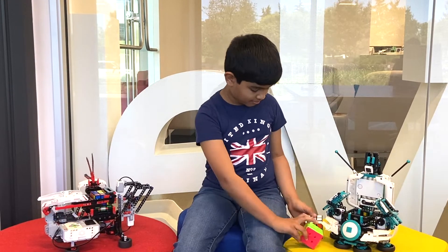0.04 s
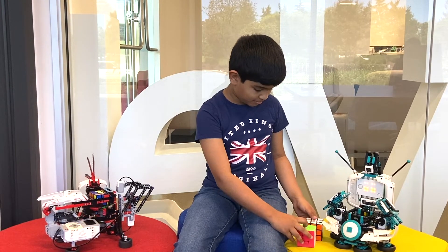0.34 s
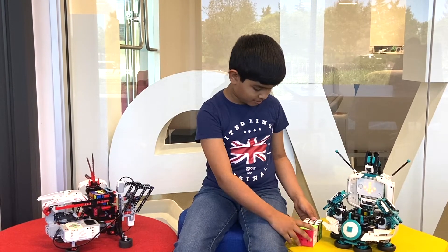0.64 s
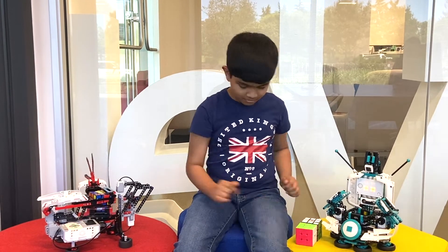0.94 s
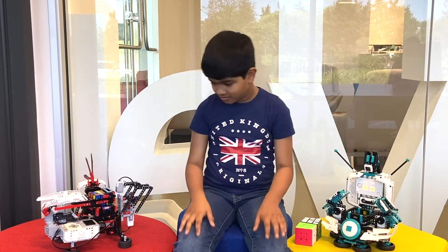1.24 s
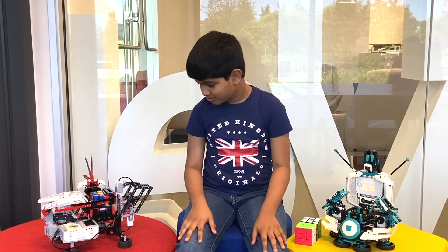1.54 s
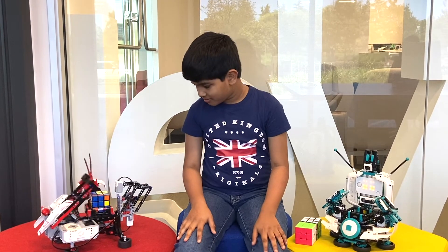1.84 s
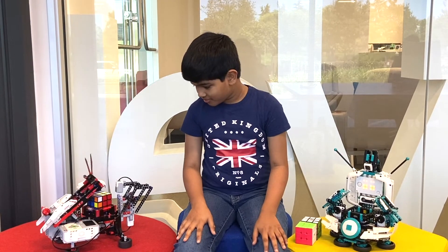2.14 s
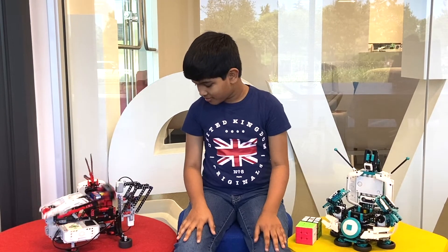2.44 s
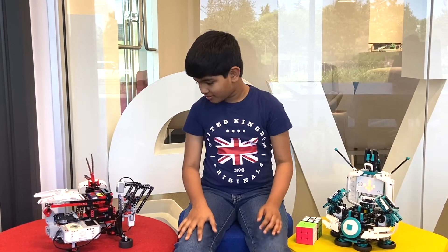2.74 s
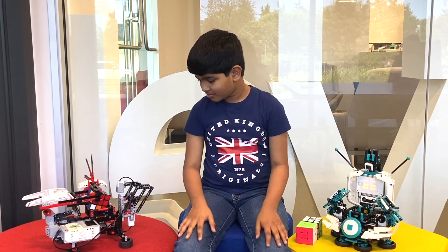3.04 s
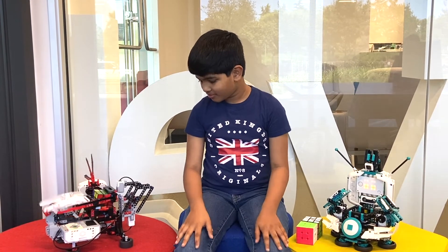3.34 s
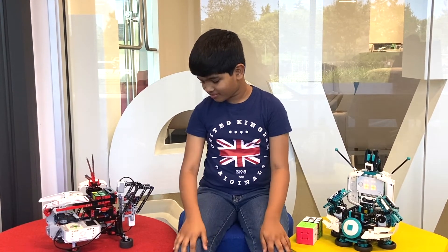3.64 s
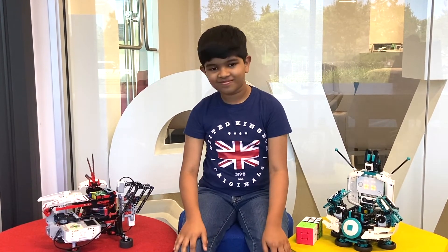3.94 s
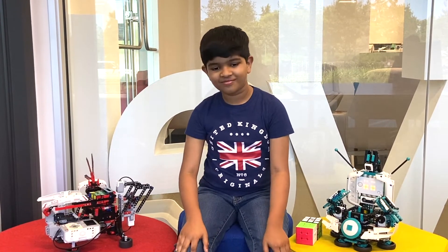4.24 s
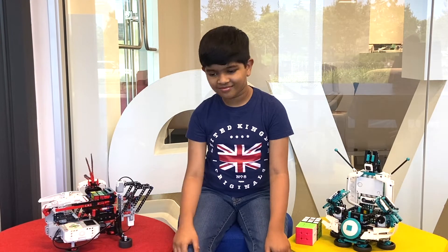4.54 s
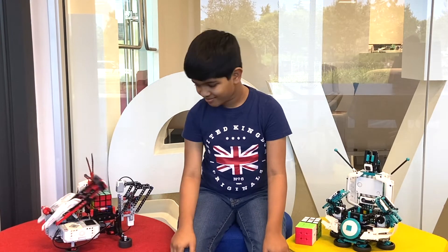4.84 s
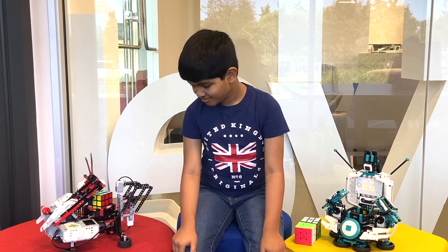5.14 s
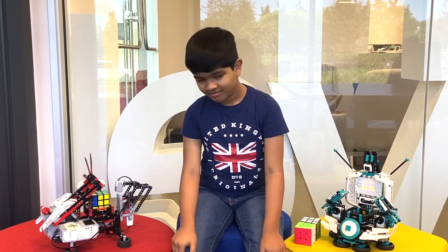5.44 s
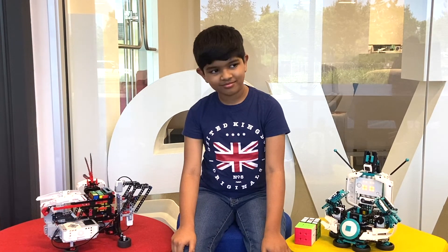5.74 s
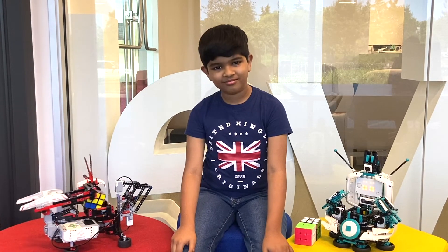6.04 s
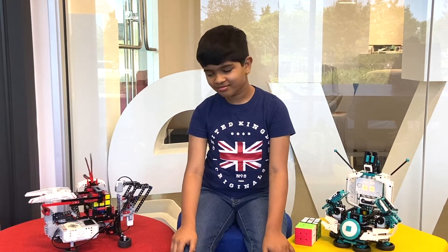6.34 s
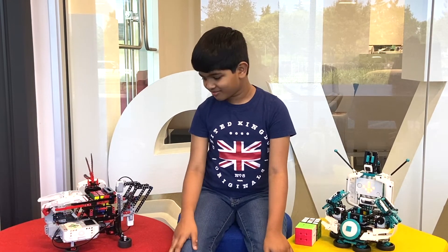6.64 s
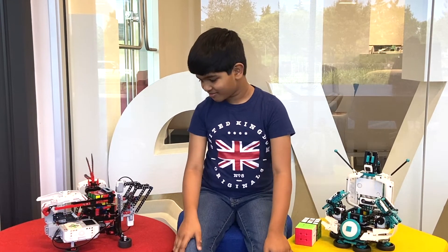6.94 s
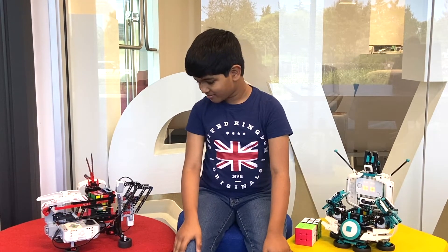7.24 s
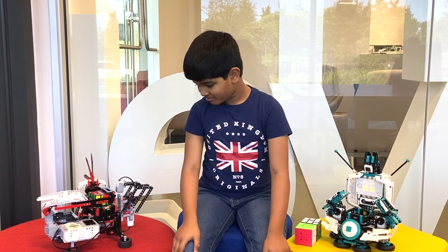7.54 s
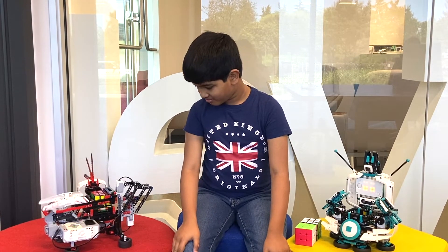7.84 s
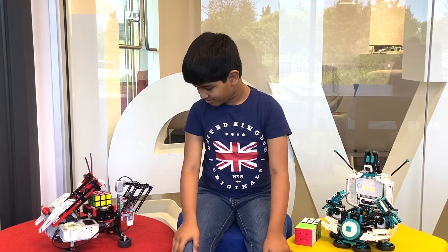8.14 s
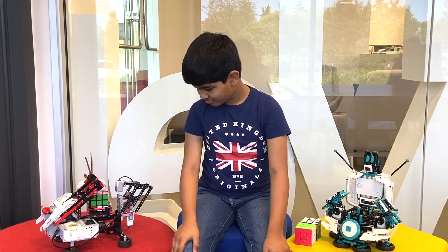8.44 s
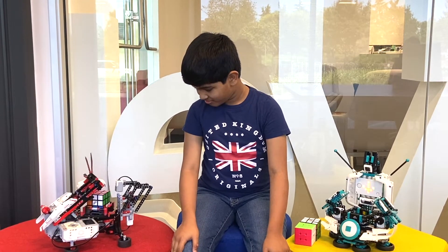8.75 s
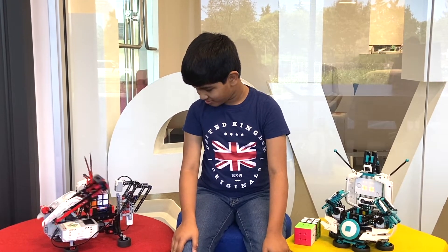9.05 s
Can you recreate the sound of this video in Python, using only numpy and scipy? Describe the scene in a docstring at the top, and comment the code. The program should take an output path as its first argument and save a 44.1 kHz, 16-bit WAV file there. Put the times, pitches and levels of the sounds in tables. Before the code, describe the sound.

A small plastic robot turns a puzzle cube, heard nearby over soft room air. It opens with a second of gear whine that rises quickly to a steady pitch, with rattling and a few clicks. Around 1.5 seconds an arm swings with a chatter and a creak, followed by a brief rasp as a cube layer twists. At 2.4 and 3.3 seconds the cube tips with sharp snaps, clatter and a light thud, with another creaking swing between. The whine returns from 3.6 to 4.2 seconds. A swing and click at 4.7 lead to a rasping twist with a faint motor groan. The cube tumbles at 5.5, and creaks, clicks and clatter continue until 6.5. A third whine runs from 6.8 to 7.4. After a swing at 7.8, a longer rasp lasts until 8.9, ending in loud snaps and a thud around 9.1.

```python
"""A cube-solving robot of plastic bricks works on a table in a small room. Its geared turntable whines
when it spins freely and rasps when it twists a layer of the cube. An arm swings over, creaks, clicks
against its stops and tips the cube, which tumbles back into its cradle with a thud. Meshing teeth make
the tones; tiny contacts and sharp snaps ring through the plastic, over a soft rush of room air."""
import sys
import numpy as np
from scipy import signal
from scipy.fft import rfft, irfft, next_fast_len
from scipy.io import wavfile
from scipy.ndimage import uniform_filter1d, map_coordinates

SR = 44100
rng = np.random.default_rng(int(sys.argv[2]) if len(sys.argv) > 2 else 0)


def int16_out(signal):
    """Quantize to a 16-bit WAV file."""
    q = np.round(np.clip(np.atleast_2d(signal).T, -1, 1) * 32767)
    wavfile.write(sys.argv[1], SR, q.astype(np.int16))


N = 406161
T = np.arange(N) / SR

# The ring of the gearbox. Each row: centre in Hz, width in Hz, relative peak in dB.
GEARBOX_MODES = [(1431, 29, 7), (1910, 295, -2.5), (2520, 20, -32), (3020, 60, -0.5), (3548, 70, 3),
                 (4050, 190, -4.5), (4490, 58, -4.5), (4850, 91, -2), (5900, 290, -6.5), (7060, 76, -6)]
# The ring of the cube. Each row: centre in Hz, width in Hz, relative peak in dB.
CUBE_MODES = [(756, 190, -8.5), (1115, 85, -11), (1427, 19, 5.5), (1832, 150, 3), (2965, 710, 4),
              (4800, 110, -4.5), (6640, 150, -2)]


def amp(db):
    """Decibels to gain."""
    return 10 ** (np.asarray(db) / 20)


def unit(x):
    """Scale to rms 1."""
    return x / np.sqrt(np.mean(x ** 2) + 1e-20)


def along(points, hz):
    """Read a curve of (Hz, value) points on a log frequency axis."""
    f, v = np.transpose(points)
    return np.interp(np.log(hz + 1), np.log(f + 1), v)


def envelope(moves, rise_db, fall_db_per_s, bend, edge_s=0.0021):
    """Gain of (start, rise, hold, dB) moves: each sets in rise_db down, swells, holds and dies away."""
    total = np.zeros(N)
    for start, rise, hold, db in moves:
        t = T - start
        swell_db = rise_db * np.clip(1 - t / rise, 0, 1) ** bend
        fade_db = fall_db_per_s * np.maximum(t - rise - hold, 0)
        total += amp(db - swell_db - fade_db) * np.clip(t / edge_s, 0, 1)
    return total


def latest(moves):
    """Per sample: the time since the latest move began, then that move's other columns."""
    rows = np.array(moves)
    start, *columns = rows[np.maximum(np.searchsorted(rows[:, 0], T) - 1, 0)].T
    return [np.maximum(T - start, 0), *columns]


def wobble(rate):
    """A smooth random curve, rate knots a second."""
    coarse = T[::16]
    knots = rng.standard_normal(int(N * rate / SR) + 4)
    return np.interp(T, coarse, map_coordinates(knots, [coarse * rate]))


def angle(hz):
    """Running angle in radians of a changing frequency."""
    return 2 * np.pi * np.cumsum(hz) / SR


def add(track, s, sound):
    """Mix a sound into the track at time s."""
    part = track[max(round(s * SR), 0):][:len(sound)]
    part += sound[:len(part)]


def filtered(x, response):
    """Shape x with a complex frequency response."""
    m = next_fast_len(N + SR // 4)
    return irfft(rfft(x, m) * response(np.fft.rfftfreq(m, 1 / SR)), m)[..., :N]


def body(x, spectrum, modes=(), ring_db=0, size=4096):
    """Ring x through a body: a broad spectrum with resonances on top; white noise keeps its power."""
    hz = np.fft.rfftfreq(size, 1 / SR)
    peaks = 1 + sum(amp(db + ring_db) ** 2 / (1 + (2 * (hz - c) / w) ** 2) for c, w, db in modes)
    cepstrum = irfft(np.log(amp(along(spectrum, hz)) * np.sqrt(peaks)))
    cepstrum[1:size // 2] *= 2  # minimum phase: the ring follows the hit
    cepstrum[size // 2 + 1:] = 0
    ring = irfft(np.exp(rfft(cepstrum)))
    return signal.fftconvolve(x, ring / np.linalg.norm(ring))[:N]


def loose_joints(x, depth_db):
    """Loose joints shift as they move, so the frame favours ever new narrow bands; rms 1."""
    z = signal.stft(x, nperseg=1024)[2]
    field = rng.standard_normal(z.shape)
    for _ in range(2):
        field = uniform_filter1d(uniform_filter1d(field, size=4, axis=0), size=5, axis=1)
    return unit(signal.istft(z * amp(depth_db * unit(field)), nperseg=1024)[1][:N])


def ticks(rate, clump_db):
    """Tiny random contacts, rate a second, in clumps of a few milliseconds; rms 1."""
    hits = rng.random(N) < rate / SR
    return unit(hits * rng.choice([-1, 1], N) * amp(clump_db * wobble(220)))


def burst(attack, t60):
    """Noise that swells and dies; its loudest part has about unit rms."""
    t = T[:SR // 3]
    shape = (1 - np.exp(-t / attack)) * np.exp(-np.log(1000) * t / t60)
    return rng.standard_normal(len(t)) * shape / shape.max()


def gear_tone(phase, waver_db, rough):
    """One partial of the meshing teeth; uneven teeth give it a skirt of noise."""
    phase = phase + rng.uniform(0, 2 * np.pi)
    strength = amp(waver_db * wobble(30)) + rough * wobble(260)
    return strength * np.cos(phase) + rough * wobble(260) * np.sin(phase)


def room_air():
    """The soft, low rush of the room's air, as two independent noises."""
    # The colour of the air. Each row: frequency in Hz, relative level in dB.
    air_colour = [(20, -29), (45, -10), (80, -4.5), (130, -3.5), (200, 3.5), (300, -6), (500, -14),
                  (1000, -9.5), (2000, -11), (4000, -14.5), (8000, -28), (15000, -47)]
    return amp(-66.5) * np.array([body(rng.standard_normal(N), air_colour) for _ in range(2)])


def reflections(x):
    """Glass walls answer; the treble dies first."""
    # The room's decay. Each row: frequency in Hz, seconds to fall by 60 dB.
    decay_times = [(150, 0.55), (1000, 0.37), (4000, 0.27), (12000, 0.077)]
    hz, t, z = signal.stft(rng.standard_normal(SR // 2), SR, nperseg=256)
    tail = signal.istft(z * amp(-60 * t / along(decay_times, hz)[:, None]), SR, nperseg=256)[1]
    tail = np.pad(tail, (SR // 200, 0))  # 5 ms pre-delay
    return signal.fftconvolve(x, tail / np.linalg.norm(tail))[:N]


def clicks():
    """Plastic parts snap together: a short crack and a buzz of loose parts; hard contacts are brighter."""
    # The snaps. Each row: time in seconds, relative level in dB, brightness in dB.
    snaps = [(0.072, -39.5, 0), (.129, -29.5, -2), (.165, -30, -1), (.199, -28, -1), (.448, -30.5, 3),
             (1.606, -38, 8), (1.667, -31, 8), (1.833, -39, 6), (1.857, -34.5, 13), (2.417, -18.5, -6),
             (2.453, -18, 11), (2.917, -30.5, 4), (2.983, -25, 0), (3.274, -23.5, -4), (3.289, -22.5, -18),
             (3.338, -20, 2), (3.366, -18.5, 9), (3.46, -32.5, 17), (4.729, -32, -1), (4.804, -21.5, -16),
             (5.548, -20.5, 3), (5.574, -20, 13.5), (5.83, -33.5, 4), (6.061, -30, 3.5), (6.114, -24.5, -4),
             (6.314, -25, -5), (6.466, -23, 2), (6.961, -39, 6), (9.031, -30, 9.5), (9.066, -20, 4),
             (9.089, -18.5, 4), (9.107, -22, 16), (9.127, -21, 11)]
    # The colour of a snap. Each row: frequency in Hz, relative level in dB.
    snap_colour = [(100, -20), (400, -15.5), (750, 4), (1100, 2.5), (1700, 3.5), (2900, -1.5), (4500, 1.5),
                   (7500, -5), (11000, -14), (15000, -10)]
    edge_colour = [(1000, -20), (4000, -4), (7000, -2), (15000, -5)]
    blows, edges = np.zeros(N), np.zeros(N)
    for s, db, bright_db in snaps:
        crack = burst(attack=0.0016, t60=0.061)
        buzz = 0.44 * burst(attack=0.0078, t60=0.094)
        add(blows, s, amp(db - 11.5) * (crack + buzz))
        add(edges, s, amp(db + bright_db - 21.5) * burst(attack=0.00058, t60=0.052))
    return body(blows, snap_colour, CUBE_MODES, ring_db=9) + body(edges, edge_colour)


def thud(db, hz):
    """A dull knock into the table."""
    # The colour of the knock. Each row: multiple of its pitch, relative level in dB.
    thud_colour = [(.15, -56), (.45, -9.5), (.7, -6), (1, 0), (1.5, -10), (2.5, -21.5), (6, -23), (20, -70)]
    return body(amp(db) * burst(attack=0.0053, t60=0.11), [(k * hz, gain) for k, gain in thud_colour])


def tumble():
    """The tipped cube clatters over loose bricks and lands in its cradle with a double thud."""
    # The arm tips the cube. Each row: start, rise and hold in seconds, relative level in dB.
    tips = [(2.31, 0.15, 0.021, -33.5), (3.145, 0.12, 0.13, -37.5), (5.46, 0.1, 0.058, -33),
            (6.295, 0.034, 0.026, -35), (6.35, 0.12, 0.028, -37), (8.99, 0.12, 0.037, -32.5)]
    # The colour of the clatter. Each row: frequency in Hz, relative level in dB.
    clatter_colour = [(100, -22), (400, -19.5), (750, -13.5), (1100, -10), (1500, -2), (2000, -8),
                      (2500, -3.5), (3100, -9), (4600, -4.5), (6000, -5.5), (7500, -11), (11000, -11.5),
                      (15000, -19)]
    # The landings. Each row: time in seconds, level in dB, landing pitch and settling pitch in Hz.
    drops = [(2.469, -45.5, 430, 243), (3.375, -49, 383, 240), (5.583, -43.5, 353, 210),
             (6.466, -55, 356, 198), (6.94, -59.5, 420, 302), (9.11, -43.5, 528, 247)]
    clatter = body(ticks(rate=6500, clump_db=1), clatter_colour, CUBE_MODES, ring_db=0.5)
    clatter = loose_joints(clatter, depth_db=4)
    landings = np.zeros(N)
    for s, db, hz, settle_hz in drops:
        add(landings, s, thud(db, hz))
        add(landings, s + 0.023, thud(db - 0.2, settle_hz))  # deeper as the cube settles
    tipping = envelope(tips, rise_db=21.5, fall_db_per_s=235, bend=1.36, edge_s=0.0059)
    return amp(-2.5) * tipping * clatter + landings


def pivot_creaks():
    """Under load the arm's pivot creaks on a resonance of its beams."""
    # The creaks. Each row: centre in seconds, pitch in Hz, level in dB, half length in seconds.
    squeaks = [(1.622, 1820, -42, 0.0085), (1.693, 1804, -43.5, 0.018), (2.79, 1750, -44.5, 0.033),
               (2.83, 2840, -36.5, 0.0064), (4.794, 1855, -55, 0.044), (5.916, 1754, -42, 0.023),
               (6.067, 2760, -45, 0.01), (7.953, 1893, -45.5, 0.047)]
    creaks, wander = np.zeros(N), angle(35 * wobble(45))
    for s, hz, db, half_s in squeaks:
        swell = amp(db) * np.exp(-((T - s) / half_s) ** 2)
        creaks += swell * gear_tone(2 * np.pi * hz * T + wander, waver_db=2.5, rough=0.9)
    return creaks


def arm():
    """Gear teeth chatter: hard into the arm's beams in a swing, lightly into the gearbox in a nudge."""
    # The arm swings over. Each row: start, rise and hold in seconds, relative level in dB.
    swings = [(1.54, .13, 0.013, -42), (2.655, 0.11, 0.053, -41.5), (4.706, 0.037, 0.078, -42),
              (5.82, 0.08, 0.042, -41.5), (7.812, 0.088, 0.067, -43)]
    # Nudges line the parts up. Each row: start, rise and hold in seconds, relative level in dB.
    nudges = [(1.3, 0.082, 0.044, -49), (4.43, .1, .01, -47.5), (6.56, .04, 0.015, -52),
              (7.575, 0.072, 0.051, -50.5)]
    # The colour of a swing. Each row: frequency in Hz, relative level in dB.
    swing_colour = [(100, -19), (400, -20), (750, -11.5), (1100, -7), (1500, -2.5), (2000, -8.5),
                    (2500, 2.5), (3100, 0.7), (4600, -5), (6000, -2.5), (7500, -4.5), (11000, -6.5),
                    (15000, -17.5)]
    # The colour of a nudge. Each row: frequency in Hz, relative level in dB.
    nudge_colour = [(100, -47), (400, -17), (800, -6), (1500, -3.5), (2500, -3), (4000, 1), (7500, -0.5),
                    (11000, -4), (15000, -22)]
    # The ring of the beams. Each row: centre in Hz, width in Hz, relative peak in dB.
    beam_modes = [(1846, 130, 16), (2833, 74, 7.5), (3600, 200, 7), (4656, 72, 12), (5030, 140, 9),
                  (4840, 34, 0), (5720, 150, 5.5)]
    chatter = ticks(rate=6000, clump_db=0) * amp(2.73 * wobble(60))
    swing = loose_joints(body(chatter, swing_colour, beam_modes, ring_db=1), depth_db=3.5)
    light_chatter = ticks(rate=8000, clump_db=2.5)
    nudge = loose_joints(body(light_chatter, nudge_colour, GEARBOX_MODES, ring_db=8.5), depth_db=3)
    swinging = envelope(swings, rise_db=21, fall_db_per_s=97.5, bend=2.1)
    nudging = envelope(nudges, rise_db=21, fall_db_per_s=291, bend=1.77)
    return amp(0.5) * swinging * swing + amp(1.64) * nudging * nudge


def turntable_twist():
    """Under load the cube's layers scrape, the gears rasp once a turn and the motor groans."""
    # The twists. Each row: start, rise and hold in seconds, relative level in dB.
    twists = [(1.824, 0.015, .36, -47.5), (4.927, 0.076, 0.34, -40), (8.064, 0.052, 0.76, -41)]
    # The colour of the rasp. Each row: frequency in Hz, relative level in dB.
    rasp_colour = [(100, -34), (400, -16), (750, -19.5), (1100, -14.5), (1500, -13.5), (2000, -1.5),
                   (2500, -2.5), (3100, -4.5), (4600, 0), (6000, -1.5), (7500, -0.5), (11000, -2),
                   (15000, -14.0)]
    # The tones of the groan. Each row: multiple of the motor speed, relative level in dB.
    groan_partials = [(6, -29), (9, 4.5), (10, 5), (13, -12), (15, -3), (16, 7), (23, 0), (25, -13)]
    start_hz, top_hz, run_up_s = 61.4, 91.2, 0.37  # motor turns per second, time to full speed
    age = latest(twists)[0]
    motor_hz = start_hz + (top_hz - start_hz) * np.sin(np.pi / 2 * np.minimum(age / run_up_s, 1))
    shaft = angle(motor_hz)
    effort = envelope(twists, rise_db=16.5, fall_db_per_s=262, bend=1.75) * amp(0.71 * wobble(26))
    scrape = ticks(rate=9000, clump_db=1.43) * (1 + 0.073 * np.cos(shaft))
    rasp = loose_joints(body(scrape, rasp_colour, GEARBOX_MODES, ring_db=9), depth_db=1.5)
    groan = unit(sum(amp(db) * gear_tone(k * shaft, waver_db=4.5, rough=0.61)
                     for k, db in groan_partials))
    settled = np.interp(motor_hz, [70, 87], [0, 1])  # tones form near full speed
    running = effort / (effort + amp(-42))  # and depend little on load
    bites = np.zeros(N)
    for s, *_ in twists:
        add(bites, s + 0.052, thud(db=-51, hz=270))  # the turntable takes hold of the cube
    return amp(0.5) * effort * rasp + amp(-55.5) * settled * running * groan + bites


def turntable_spin():
    """Free-running gears whine, hiss and rattle; an off-centre pinion puts sidebands on every tone."""
    # The free spins. Each row: start and length in seconds, top tooth rate in Hz,
    # depth of the speed hunting in Hz, relative level in dB.
    spins = [(0.069, 1.02, 786, 7.2, -50.5), (3.647, 0.58, 779, 2.85, -49.5),
             (6.796, 0.57, 780.3, 1.29, -50)]
    # The tones of the whine. Each row: multiple of the tooth rate, relative level in dB, waver in dB.
    whine_partials = [(1, -18.5, 3.5), (2, -12, -5.5), (3, -5.5, 5.5), (4, 7.5, 2), (5, 0, 4), (6, 1.5, 4),
                      (7, -5, 5.5), (8, -15, 6.5), (9, -7.5, -2), (10, -16, 5)]
    # The colour of the gear hiss. Each row: frequency in Hz, relative level in dB.
    hiss_colour = [(100, -46), (400, -33.5), (750, -15), (1100, -18), (1500, -12.5), (2000, -13),
                   (2500, -3.5), (3100, -10), (4600, 2), (5400, -0.5), (6100, -9), (7300, -0.5),
                   (11000, -2.5), (15000, -22)]
    # The colour of the backlash rattle. Each row: frequency in Hz, relative level in dB.
    rattle_colour = [(100, -62), (400, -14), (800, -15.5), (1500, -3), (2500, 0), (4000, 1.5),
                     (7500, -11.5), (11000, -12.5), (15000, -20)]
    lag_hz, run_up_s, hunt_s = 194.3, 0.1, 0.42  # the motor starts slow, then hunts about its top speed
    rise_s, linger_s = 0.064, 0.018  # the hiss builds up; the whine outlasts it
    drone_hz, drone_width_hz = 1475, 53

    age, _, top_hz, hunt_hz, _ = latest(spins)
    hunting = hunt_hz * np.cos(2 * np.pi * (age - 0.33) / hunt_s)
    tooth_hz = top_hz - lag_hz * np.exp(-age / run_up_s) + hunting
    mesh = angle(tooth_hz)
    shaft = mesh / 12  # twelve teeth a turn
    mesh = mesh + 0.086 * np.sin(shaft) + 0.22 * wobble(45)
    drive = envelope([(s, rise_s, length - rise_s, db) for s, length, *_, db in spins],
                     rise_db=12.5, fall_db_per_s=362, bend=1.9)
    singing = envelope([(s, rise_s, length - rise_s + linger_s, db) for s, length, *_, db in spins],
                       rise_db=12, fall_db_per_s=370, bend=1.1)

    tones = unit(sum(amp(db) * gear_tone(k * mesh, waver_db, rough=0.33)
                     for k, db, waver_db in whine_partials))
    settled = np.interp(tooth_hz, [715, 765], [0.15, 1])  # the teeth bounce until up to speed
    whine = amp(9) * settled * singing * amp(0.47 * wobble(22)) * tones
    # as the motor brakes, the sixth harmonic sings out briefly
    braking = sum(np.exp(-((T - s - length - 0.035) / 0.06) ** 2) for s, length, *_ in spins)
    brake_tone = amp(-52) * braking * gear_tone(6 * mesh, waver_db=2, rough=0.5)
    # the second harmonic swells as it sweeps through a gearbox resonance
    second = gear_tone(2 * mesh, waver_db=2.5, rough=0.38)
    drone = unit(body(second, [(1000, -14), (1400, 6), (2000, -8)], modes=[(1350, 140, 3)]))
    in_tune = 1 / (1 + (2 * (2 * tooth_hz - drone_hz) / drone_width_hz) ** 2)

    contacts = ticks(rate=15000, clump_db=-0.5) * (1 + 0.045 * np.cos(shaft)) * (1 + 0.5 * np.cos(mesh))
    hiss = loose_joints(body(contacts, hiss_colour, GEARBOX_MODES, ring_db=5), depth_db=2.5)
    knocks = ticks(rate=5400, clump_db=4)
    rattle = loose_joints(body(knocks, rattle_colour, CUBE_MODES, ring_db=-4.5), depth_db=2.5)
    backlash = amp(-17.5) + np.exp(-((age - 0.13) / 0.071) ** 2)  # hardest just after the start
    gear_noise = amp(7) * in_tune * drone + amp(6) * hiss + amp(11) * backlash * rattle
    return whine + brake_tone + drive * gear_noise


def scene():
    """The robot near the middle, with reflections and the room's air around it."""
    # The stereo width of the room. Each row: frequency in Hz, gain of the side signal.
    width = [(60, .15), (150, 0.21), (500, .45), (1050, 0.53), (1650, 1), (2400, 0.11), (3100, 0.087),
             (3600, 0.013), (7400, 0.013), (8000, 0.25), (15000, 0.15)]
    robot = turntable_spin() + turntable_twist() + arm() + pivot_creaks() + tumble() + clicks()
    robot = filtered(robot, lambda hz: hz ** 4 / (hz ** 4 + 105 ** 4))  # a small frame has little bass
    air = room_air()
    mid = robot + amp(-10) * reflections(robot) + air[0]
    side = filtered(amp(-7) * reflections(robot) + air[1], lambda hz: along(width, hz))
    return np.array([mid + side, mid - side])


def record(dry):
    """The microphones cut the deep bass and the very top, and differ in level and phase."""
    # The stereo balance. Each row: frequency in Hz, left minus right in dB.
    balance = [(200, 0), (400, 1.5), (600, 4), (1100, 4), (1350, -.5), (2400, .5), (4400, 0)]
    # The phase between the channels. Each row: frequency in Hz, lead of the left in radians.
    left_lead = [(0, 0), (600, .2), (980, 1), (1200, .1), (1550, 1.4), (2200, .1), (7500, 0), (8850, -3.1),
                 (9300, -3.2), (10850, -6.25), (11550, -6.3), (12900, -9.4), (13700, -9.45), (14800, -12.5)]
    low_hz, top_hz = 45, 15830

    def channels(hz):
        lead = np.interp(hz, *np.transpose(left_lead))
        left = amp(along(balance, hz) / 2) * np.exp(1j * lead / 2)
        low_cut = hz ** 2 / np.sqrt(hz ** 4 + low_hz ** 4)
        return np.array([left, 1 / left]) * low_cut * (hz < top_hz)
    return filtered(dry, channels)


dry = scene()
out = record(dry)
int16_out(out)
```